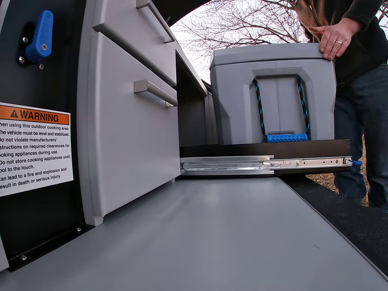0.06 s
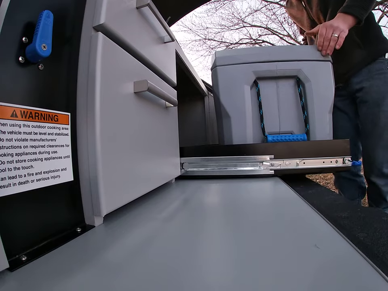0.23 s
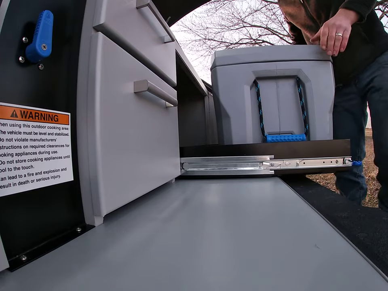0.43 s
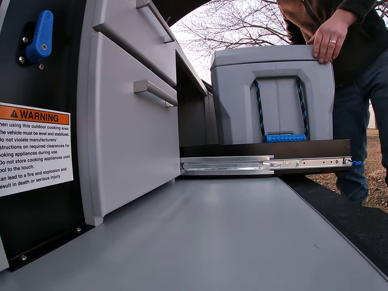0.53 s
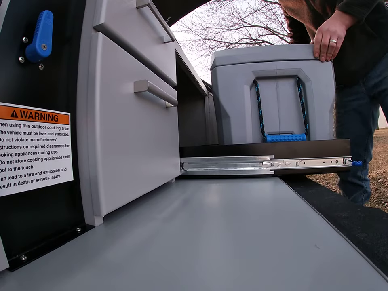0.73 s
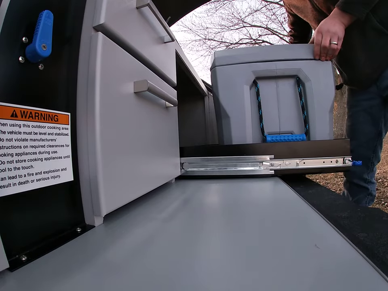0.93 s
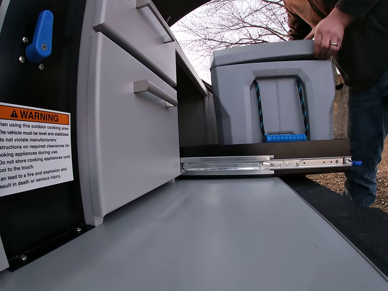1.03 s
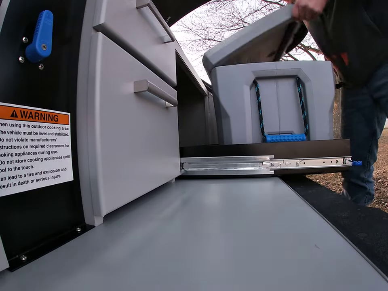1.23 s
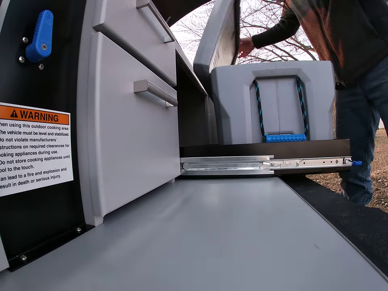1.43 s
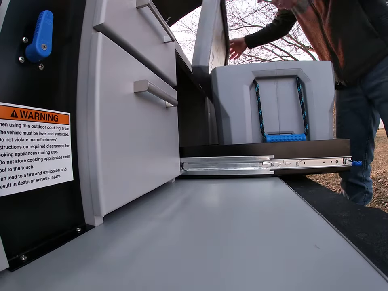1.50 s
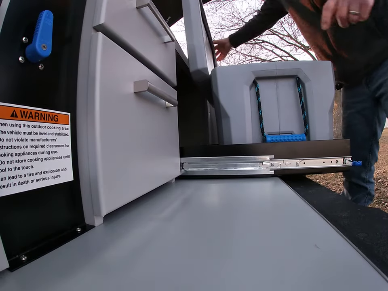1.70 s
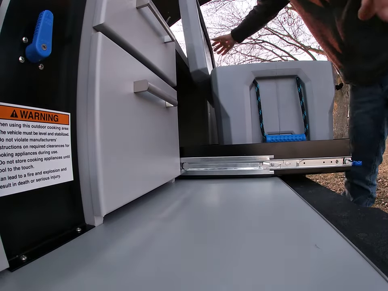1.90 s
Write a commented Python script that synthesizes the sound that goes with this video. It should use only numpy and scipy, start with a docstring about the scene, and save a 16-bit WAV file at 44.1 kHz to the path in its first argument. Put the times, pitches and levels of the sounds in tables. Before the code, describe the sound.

A loaded plastic cooler on a pulled-out steel-slide tray gives a quick rattling knock with a tiny squeak, then small bumps, sleeve rustle and a deep hollow pop as the lid comes loose; close microphone, outdoors.

```python
"""Hollow compartment: a plastic cooler on a pulled-out tray with steel drawer slides, one microphone beside it.
Outdoor rumble and jacket rustle: shaped noise. Tray thuds: decaying low modes.
Tray and lid knocks: cooler and slide modes plus decaying noise bands. Slide squeak: falling rough sine with echo.
Lid tugged loose: grainy noise rubs, then a hollow pop from one mode."""
import sys
import numpy as np
from scipy import signal
from scipy.fft import rfft, irfft, next_fast_len
from scipy.io import wavfile
from scipy.ndimage import map_coordinates

SR = 44100
rng = np.random.default_rng(int(sys.argv[2]) if len(sys.argv) > 2 else 0)


def int16_out(signal):
    """Quantize to a 16-bit WAV file."""
    q = np.round(np.clip(np.atleast_2d(signal).T, -1, 1) * 32767)
    wavfile.write(sys.argv[1], SR, q.astype(np.int16))


N = 85995

# outdoor rumble spectrum, relative: f/Hz, level/dB
RUMBLE_SPECTRUM = [(15, -40), (25, 8.5), (71, 3.5), (142, -2.5), (213, 0.5), (301, -16), (363, -14),
                   (404, -29.5), (529, -15.5), (588, -19), (790, -16.5), (1500, -33), (2180, -46.5),
                   (2930, -42), (3180, -48), (3930, -44.5), (5140, -45.5), (8100, -43), (15000, -88.5)]
# compartment resonances in the rumble: f/Hz, width/Hz, level/dB
COMPARTMENT_HUM = [(199.4, 33.5, -44.5), (533, 51, -56)]
RUMBLE_DB = -41.5

# sleeve strokes: peak t/s, level/dB, rise/s, fall/s, brightness/(dB/octave)
SLEEVE_STROKES = [(0.123, -52.5, 0.0081, 0.037, 2), (.21, -56, 0.032, .04, -1),
                  (.29, -42, 0.035, 0.028, -1), (.786, -50.5, 0.022, 0.032, -.8),
                  (1.116, -49.5, 0.014, 0.024, -3), (1.165, -46, .018, 0.018, -1),
                  (1.258, -54.5, 0.017, 0.035, 2.5), (1.465, -50.5, 0.027, 0.034, 1),
                  (1.945, -56.5, 0.066, .05, .5)]
# cloth spectrum, relative: f/Hz, level/dB
CLOTH_SPECTRUM = [(300, -23), (900, -1), (1800, 0.5), (3500, 2), (4400, -1), (5200, 1), (8200, -3),
                  (9500, -12), (11000, -14), (13500, -26), (15500, -49)]
CLOTH_ROUGH_DB, CLOTH_GRAIN_HZ, CLOTH_PIVOT_HZ = 2, 160, 4000

# pushes that bob the loaded tray: t/s, level/dB
TRAY_BOBS = [(.128, -36.5), (0.217, -27), (0.264, -28.5), (0.326, -17.5), (0.465, -18.5), (0.517, -30.5),
             (0.614, -35), (.725, -36.5), (0.84, -30.5), (0.911, -23.5), (.972, -24.5), (1.115, -29.5),
             (1.216, -29.5), (1.278, -26.5), (1.48, -42), (1.84, -37.5)]
# modes of the bobbing tray: f/Hz, level/dB, t60/s
TRAY_MODES = [(45.4, -8, 0.16), (60.6, 5.5, 0.3), (73, -2.5, 0.15), (86.6, -17, 0.19)]
BOB_ATTACK_S = 0.008

# lid on seal and hinge: peak t/s, level/dB, rise/s, fall/s
LID_RUBS = [(.18, -46, .04, 0.058), (.74, -48, 0.017, 0.27), (1.125, -38.5, 0.025, .012),
            (1.19, -33, 0.022, 0.01), (1.255, -36, 0.013, 0.018), (1.308, -43, 0.0091, 0.01),
            (1.93, -42.5, 0.026, .04)]
# rub spectrum, relative: f/Hz, level/dB
RUB_SPECTRUM = [(200, -10), (380, -2.5), (600, -1), (780, -11), (1100, -10.5), (1500, -17.5), (1900, -25),
                (6000, -57.5)]
RUB_ROUGH_DB, RUB_GRAIN_HZ = 1, 110
POP_START_S, POP_HZ, POP_DB, POP_T60_S, POP_ATTACK_S = 1.198, 194, -3, 0.088, 0.011

# knocks of tray and lid: t/s, boom level/dB, body level/dB, clack level/dB, click level/dB
KNOCK_LEVELS = [(0.2273, -27.5, -45, -46, -41.5), (0.242, -25, -29.5, -86, -62),
                (0.2599, -38, -25.5, -36, -37), (0.273, -22, -19, -25.5, -74),
                (0.3072, -14, -14.5, -18.5, -28), (0.3128, -22, -18, -18, -27),
                (.328, -26, -18.5, -30, -51), (0.348, -25.5, -24, -32.5, -29.5),
                (.370, -15.5, -38, -49, -60), (.392, -19, -18, -23, -39.5), (.405, -15, -23, -37.5, -52),
                (.419, -15, -25, -52, -64), (.434, -18.5, -31, -45.5, -78), (.449, -27, -25, -39, -72),
                (.524, -21.5, -54, -78, -83), (0.607, -33, -54, -57, -71), (0.644, -30.5, -52, -54.5, -50),
                (0.705, -50.5, -50, -54, -82), (.841, -30.5, -55, -72, -74), (.891, -33.5, -23, -35.5, -67),
                (.909, -14, -55, -50.5, -61), (0.9461, -28, -30, -32, -51.5), (.964, -33, -27, -44.5, -61),
                (1.152, -59, -50, -34.5, -58), (1.185, -29, -33, -66, -72), (1.232, -27, -36.5, -47, -84),
                (1.250, -38, -48, -64, -79), (1.302, -34.5, -37.5, -51.5, -75),
                (1.351, -32.5, -43.5, -40.5, -82), (1.606, -68, -37.5, -63.5, -60.5)]
# centres of boom, body, clack, click: f/Hz
REGISTER_HZ = [200, 600, 2300, 7000]
# modes of cooler and compartment: f/Hz, level/dB, t60/s
SHELL_MODES = [(111.3, -12.5, 0.53), (163.4, -4, .4), (176.4, -5, 0.44), (201, -3, 0.29),
               (238, -15.5, 0.56), (391.2, -3.5, 0.29), (440, -12.5, 0.28), (524.5, -6, 0.23),
               (590.2, -7, 0.34), (627, -11, .3), (797, -15, 0.35), (1030.6, 0.5, 0.12), (1072, -13, 0.28)]
# modes of the steel slides: f/Hz, level/dB
STEEL_MODES = [(1200, -17), (1323, -25.5), (1432, -16.5), (1550, -15), (2070, -16), (2563, -18.5),
               (2760, -16.5), (3015, -19), (3429, -14), (3616, -15), (3817, -18), (6400, -16)]
# noise bands for the crowd of short modes: centre f/Hz, level/dB, t60/s
CROWD_BANDS = [(79, -17.5, 0.72), (177, -6.5, 0.39), (345.6, -18.5, 0.47), (417, -6.5, 0.32),
               (694, -8, 0.31), (993, -7, 0.18), (1390, -11, 0.26), (2250, -11.5, 0.21), (3415, -5, 0.16),
               (4560, -9, 0.17), (5930, -7, 0.12), (8280, -17.5, 0.2), (10000, -22, 0.092),
               (13000, -40, .1), (15000, -68, .1)]
SHELL_DB, CROWD_DB, SCATTER_DB = -1.5, -0.5, 3.9
SHELL_ATTACK_S, CONTACT_ATTACK_S, STEEL_T60_S = 0.0051, 0.00086, 0.2
CRACK_DB, CRACK_DECAY_S = 5, 0.0025  # extra level at first contact, time constant
RIPPLE_DB, RIPPLE_SPACING_HZ = 1.5, 20  # peaks within the crowd, shared by all knocks

# slide squeak track: t/s, f/Hz, level/dB
SQUEAK_TRACK = [(.2535, 2348, -55), (0.2535, 2130, -38), (0.259, 2020, -16), (0.2591, 1650, -21.5),
                (0.266, 1410, -23), (.269, 1270, -43.5)]
SQUEAK_ROUGH, SQUEAK_ECHO_DB, SQUEAK_ECHO_T60_S = 0.43, -4, 0.039

BAND_LIMIT_HZ = 15500


def amp(db):
    """Decibels to gain."""
    return 10 ** (np.asarray(db) / 20)


def unit(x):
    """Scale to rms 1."""
    return x / np.sqrt(np.mean(x ** 2) + 1e-20)


def along(hz, points_hz, values):
    """Interpolate on a log frequency axis."""
    return np.interp(np.log(hz + 1), np.log(np.add(points_hz, 1)), values)


def noise(gain, size):
    """Noise of rms 1, coloured by a gain function of frequency."""
    white = rfft(rng.standard_normal(size))
    return unit(irfft(white * gain(np.fft.rfftfreq(size, 1 / SR)), size))


def hiss(spectrum):
    """Noise shaped by an (f/Hz, level/dB) spectrum."""
    points_hz, levels_db = np.transpose(spectrum)
    return noise(lambda hz: amp(along(hz, points_hz, levels_db)), size=next_fast_len(N))[:N]


def fade(t, t60_s):
    """Exponential decay, 60 dB in t60."""
    return np.exp(-np.log(1000) * t / t60_s)


def ring(t, hz, t60_s, attack_s):
    """One struck mode: decaying sine with a soft onset."""
    return np.sin(2 * np.pi * hz * t) * fade(t, t60_s) * (1 - np.exp(-t / attack_s))


def add(track, start_s, sound):
    """Mix a sound into the track."""
    part = track[max(round(start_s * SR), 0):][:len(sound)]
    part += sound[:len(part)]


def friction(strokes, spectrum, rough_db, grain_hz):
    """Sliding surfaces: shaped noise in short swells with random level grain."""
    t = np.arange(N) / SR
    power = np.zeros(N)
    for peak_s, db, rise_s, fall_s in strokes:
        power += amp(db) ** 2 * np.exp(-np.abs(t - peak_s) / np.where(t < peak_s, rise_s, fall_s))
    grain = map_coordinates(rng.standard_normal(N // 20), [t * grain_hz])
    return np.sqrt(power) * amp(rough_db * grain) * hiss(spectrum)


def outdoors():
    """Steady low rumble plus noise in the compartment's resonances."""
    out = amp(RUMBLE_DB) * hiss(RUMBLE_SPECTRUM)
    for hz, width_hz, db in COMPARTMENT_HUM:
        out += amp(db) * noise(lambda f: 1 / (1 + (2 * (f - hz) / width_hz) ** 2), size=N)
    return out


def jacket():
    """Sleeve friction with each arm movement; spectrum tilt sets stroke brightness."""
    out = np.zeros(N)
    for *stroke, tilt in SLEEVE_STROKES:
        tilted = [(hz, db + tilt * np.log2(hz / CLOTH_PIVOT_HZ)) for hz, db in CLOTH_SPECTRUM]
        out += friction([stroke], tilted, CLOTH_ROUGH_DB, CLOTH_GRAIN_HZ)
    return out


def bobbing():
    """Pushes on the cooler excite the overhanging tray's low modes."""
    out, t = np.zeros(N), np.arange(SR) / SR
    thud = sum(amp(db) * ring(t, hz, t60_s, BOB_ATTACK_S) for hz, db, t60_s in TRAY_MODES)
    for start_s, push_db in TRAY_BOBS:
        add(out, start_s, amp(push_db) * thud)
    return out


def lid():
    """Lid friction, and the hollow pop of the air inside as the seal lets go."""
    out = friction(LID_RUBS, RUB_SPECTRUM, RUB_ROUGH_DB, RUB_GRAIN_HZ)
    pop = ring(np.arange(SR // 2) / SR, POP_HZ, POP_T60_S, POP_ATTACK_S)
    add(out, POP_START_S, amp(POP_DB) * pop)
    return out


def shell_and_slide_modes(t):
    """Cooler, compartment and steel slides as (f/Hz, decaying sine) pairs."""
    modes = [(hz, amp(SHELL_DB + db) * ring(t, hz, t60_s, SHELL_ATTACK_S)) for hz, db, t60_s in SHELL_MODES]
    modes += [(hz, amp(db) * ring(t, hz, STEEL_T60_S, CONTACT_ATTACK_S)) for hz, db in STEEL_MODES]
    return modes


def crowd_bands(t):
    """Dense short modes as (f/Hz, envelope, band gain): overlapping rippled noise bands."""
    centres_hz, grid_hz = [row[0] for row in CROWD_BANDS], np.fft.rfftfreq(len(t), 1 / SR)
    peaks = map_coordinates(rng.standard_normal(len(grid_hz)), [grid_hz / RIPPLE_SPACING_HZ], order=1)
    ripple = amp(RIPPLE_DB * peaks) * (grid_hz > centres_hz[0] / 2)
    contact = (1 - np.exp(-t / CONTACT_ATTACK_S)) * (1 + amp(CRACK_DB) * np.exp(-t / CRACK_DECAY_S))
    bands = []
    for (hz, db, t60_s), selector in zip(CROWD_BANDS, np.eye(len(CROWD_BANDS))):
        envelope = amp(CROWD_DB + db) * fade(t, t60_s) * contact
        bands.append((hz, envelope, ripple * along(grid_hz, centres_hz, selector)))
    return bands


def knocks():
    """Contacts excite all modes and bands by register level; mode gains scatter per knock."""
    out, t = np.zeros(N), np.arange(2 ** 15) / SR
    modes, bands = shell_and_slide_modes(t), crowd_bands(t)
    for start_s, *levels_db in KNOCK_LEVELS:
        for hz, mode in modes:
            force = amp(along(hz, REGISTER_HZ, levels_db))
            add(out, start_s, force * amp(rng.normal(0, SCATTER_DB)) * mode)
        for hz, envelope, gain in bands:
            force = amp(along(hz, REGISTER_HZ, levels_db))
            add(out, start_s, force * envelope * noise(lambda f: gain, size=len(t)))
    return out


def squeak():
    """Steel slips on steel: rough falling chirp plus a short noise-tail echo in the compartment."""
    t = np.arange(N) / SR
    track_s, track_hz, track_db = np.transpose(SQUEAK_TRACK)
    level = amp(np.interp(t, track_s, track_db, left=-120, right=-120))
    rough = 1 + SQUEAK_ROUGH * noise(lambda f: f < track_hz[-1] / 2, size=N)
    phase = 2 * np.pi * np.cumsum(np.interp(t, track_s, track_hz)) / SR
    chirp = level * rough * np.sin(phase)
    tail = (rng.standard_normal(N) * fade(t, SQUEAK_ECHO_T60_S))[:SR // 2]
    echo = signal.fftconvolve(chirp, tail / np.linalg.norm(tail))[:N]
    return chirp + amp(SQUEAK_ECHO_DB) * echo


def scene():
    """All sources summed at one microphone."""
    return (outdoors() + jacket() + bobbing() + lid() + knocks() + squeak())[None]


def record(dry):
    """Microphone chain: nothing passes above the band limit."""
    size = next_fast_len(N + SR // 2)
    passed = np.fft.rfftfreq(size, 1 / SR) < BAND_LIMIT_HZ
    return irfft(rfft(dry, size) * passed, size)[..., :N]


dry = scene()
out = record(dry)
int16_out(out)
```